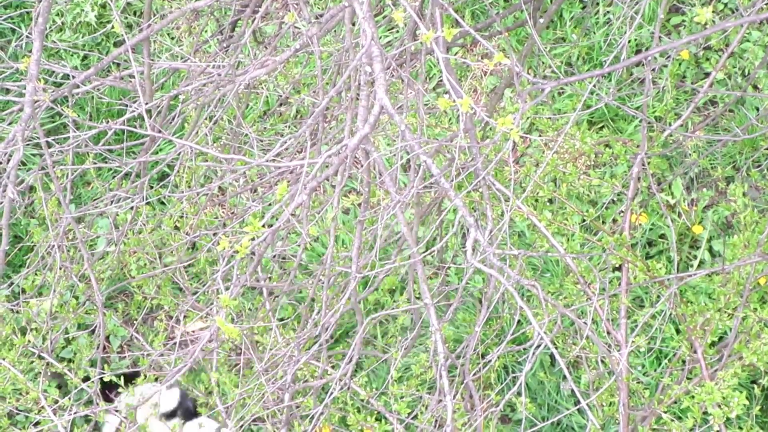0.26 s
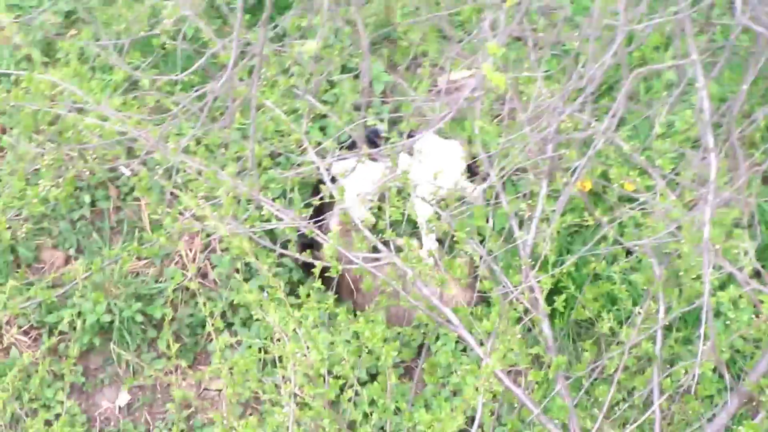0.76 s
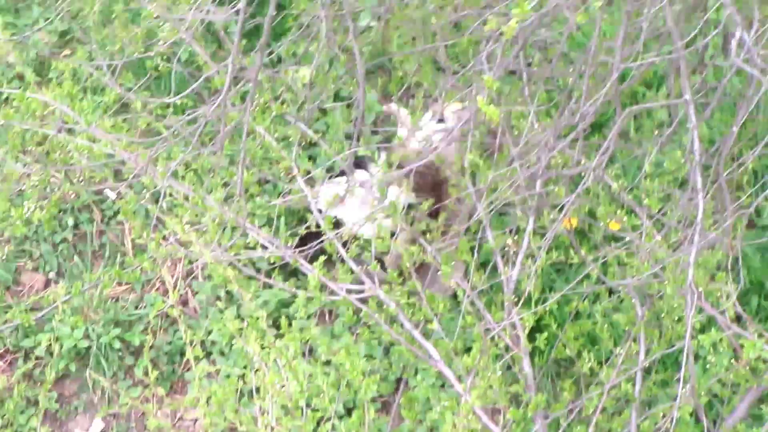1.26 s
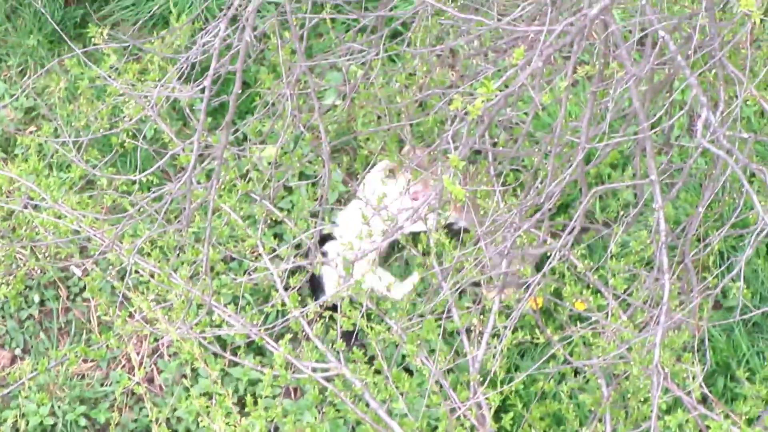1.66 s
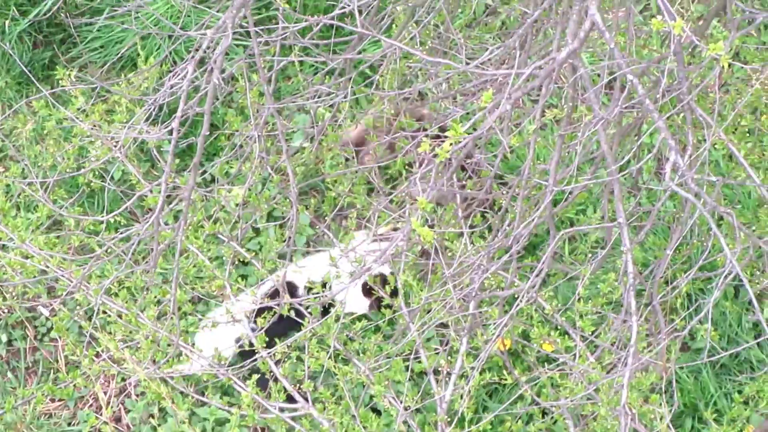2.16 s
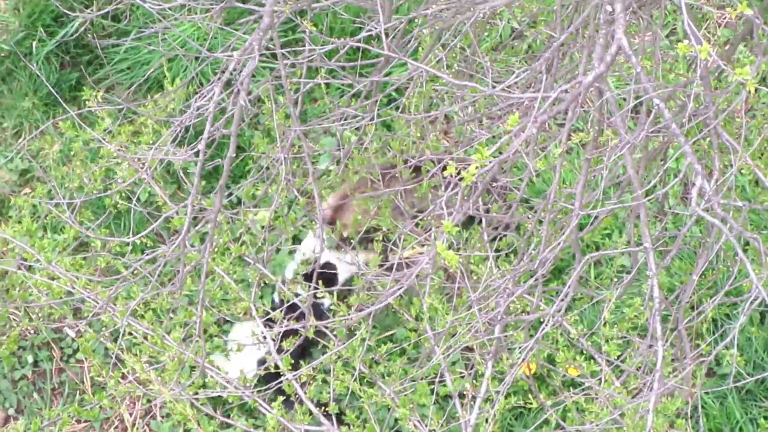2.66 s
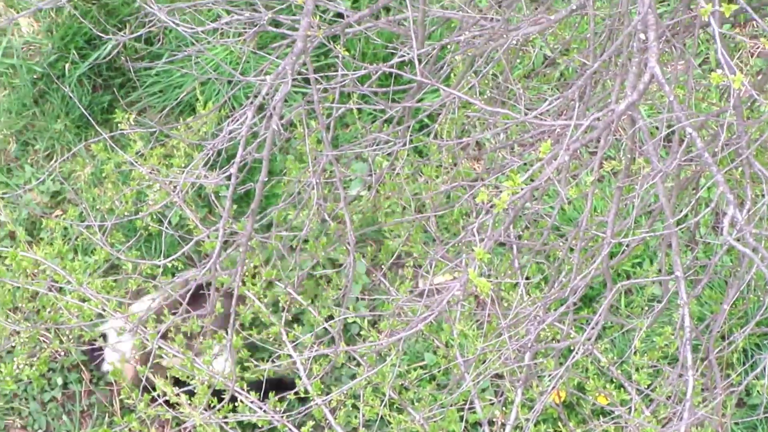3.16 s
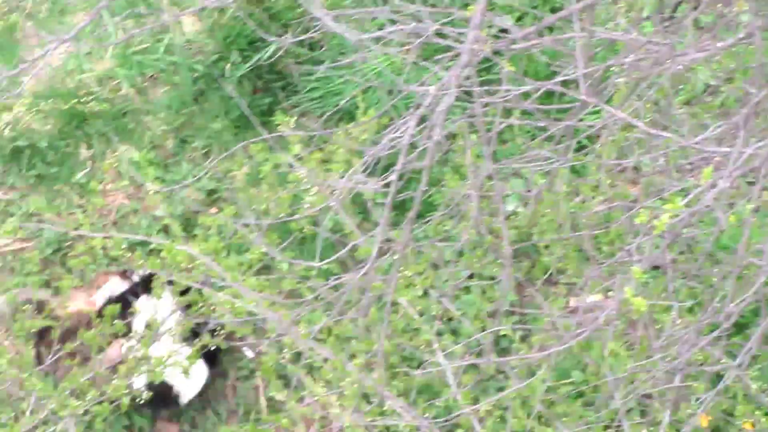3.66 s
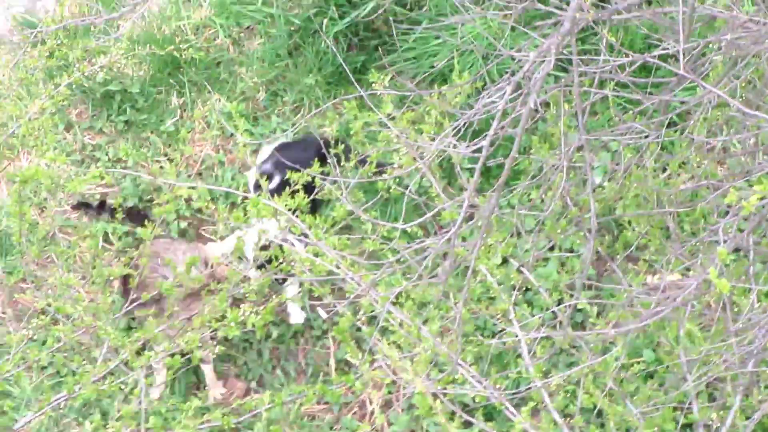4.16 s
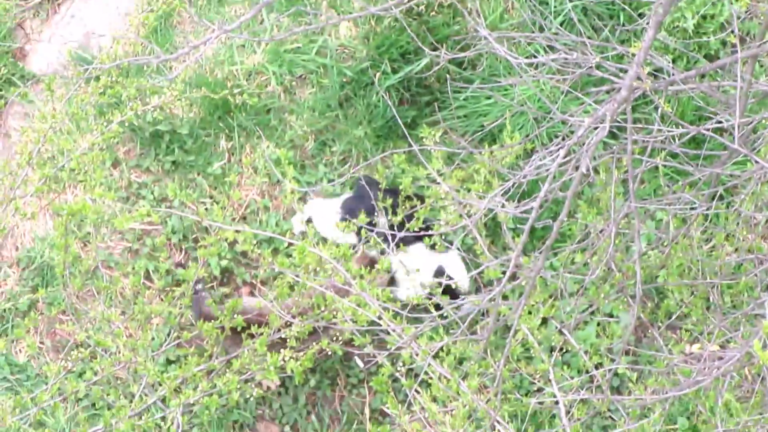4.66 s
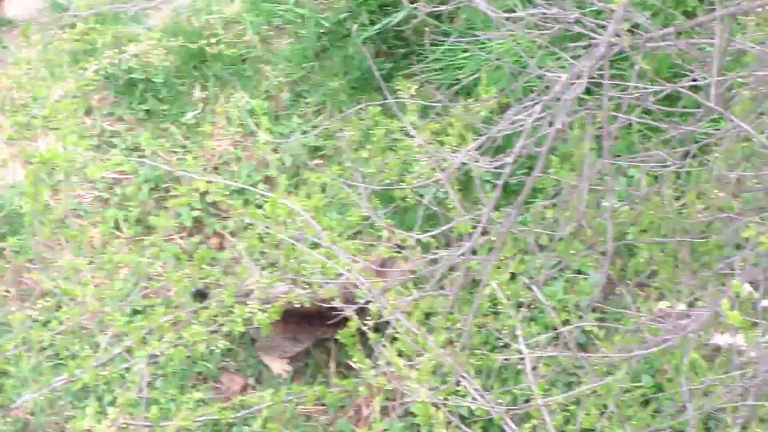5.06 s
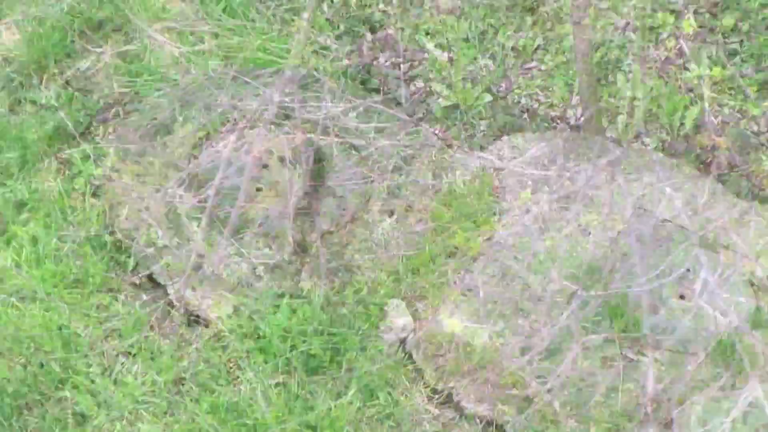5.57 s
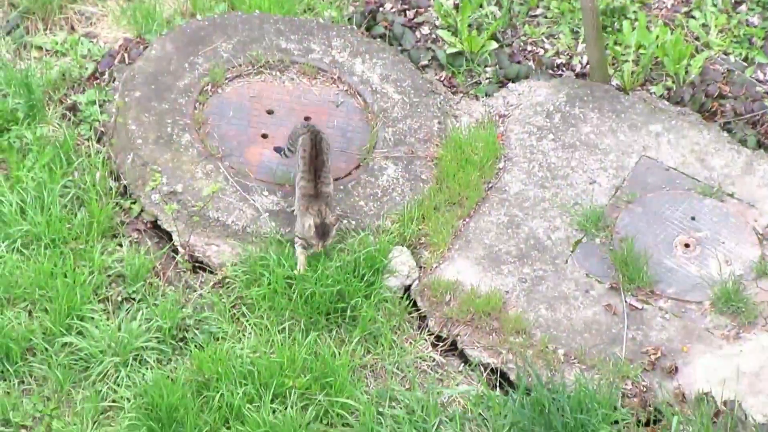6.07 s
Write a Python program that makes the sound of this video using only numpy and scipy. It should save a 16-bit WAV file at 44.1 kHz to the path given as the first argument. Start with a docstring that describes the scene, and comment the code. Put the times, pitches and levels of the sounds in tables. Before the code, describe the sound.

Two fighting cats scream at once, high, wavering and torn with rasp, in bushes below a window. Walls return a dull echo over low town rumble. After a brief gap of rustling leaves and snapping twigs, the screams resume quieter, then flare again. A vehicle accelerates past behind them, and a small bird chatters as the cats fall silent.

```python
"""From the start cats scream shrilly in undergrowth below a window, over the noise rumble of a town. Harmonic lines
on one wavering pitch break into half, third and quarter pitch and noisy rasp; nearby walls return an echo.
From 2.1 s noise bursts make leaves rustle and twigs snap. From 2.3 s a turbocharged vehicle fades in, built of
firing orders, tyre noise and a rising whistle; it accelerates past, loudest near 5.2 s.
From 4.4 s a small bird chatters in short falling sine notes."""
import sys
import numpy as np
from scipy import signal
from scipy.fft import rfft, irfft
from scipy.io import wavfile
from scipy.ndimage import uniform_filter1d

SR = 44100
rng = np.random.default_rng(int(sys.argv[2]) if len(sys.argv) > 2 else 0)


def wrap_up_sound(samples):
    """Save the sound to the file named by the first command line argument, as 16-bit audio."""
    columns = np.atleast_2d(samples).T
    # keep every value between -1 and 1, then stretch to whole-number steps
    tamed = np.clip(columns, -1, 1)
    steps = np.round(tamed * 32767).astype(np.int16)
    wavfile.write(sys.argv[1], SR, steps)


N = 279014


def from_db(db):
    """Logarithmic level: decibels to amplitude gain."""
    return 10 ** (np.asarray(db) / 20)


def rms_one(x):
    """Power normalisation: scale to rms 1."""
    return x / np.sqrt(np.mean(x ** 2) + 1e-20)


def in_time(rows):
    """Linear interpolation: columns of a table joined by straight lines, one value a sample."""
    s, *columns = np.transpose(rows)
    return [np.interp(np.arange(N) / SR, s, c) for c in columns]


def at_hz(points, hz):
    """Spectral envelope: levels interpolated on a log-frequency axis."""
    return np.interp(np.log(hz), np.log(np.array(points)[:, 0]), np.array(points)[:, 1])


def between(start, end, fade):
    """Gating: open from start to end, with linear fades centred on both."""
    t = np.arange(N) / SR
    return np.clip(np.minimum(t - start, end - t) / fade + .5, 0, 1)


def held(rows, fade):
    """Gating of tables: each column holds its value from start to end of its row, and is zero elsewhere."""
    gates = np.array([between(start, end, fade) for start, end, *values in rows])
    return np.array([values for start, end, *values in rows]).T @ gates


def drift(rate, size=N):
    """Random modulation: noise through a double one-pole low-pass at rate Hz; spread about 1."""
    r = np.exp(-2 * np.pi * rate / SR)
    noise = rng.standard_normal(size + SR // 4)
    return rms_one(signal.lfilter([1], [1, -2 * r, r * r], noise))[SR // 4:]  # drop the filter's start


def coloured(spectrum):
    """Spectral shaping: noise with the given spectrum; rms 1."""
    hz = np.maximum(np.fft.rfftfreq(N, 1 / SR), 1)
    return rms_one(irfft(rfft(rng.standard_normal(N)) * from_db(at_hz(spectrum, hz)), N))


def band_noise(noise, low_hz, high_hz):
    """Band limitation: a band-pass filter leaves one region of the noise; rms 1."""
    band = signal.butter(2, [low_hz, high_hz], "band", fs=SR, output="sos")
    return rms_one(signal.sosfilt(band, noise))


# town rumble, relative spectral density: (f/Hz, level/dB per Hz)
TOWN_SPECTRUM = [(18, -37), (30, -5.5), (69, -8), (228, -8), (404, -11.5), (1170, -10.5), (1480, -12.5),
                 (2700, -24.5), (3680, -34), (15000, -54.5)]
TOWN_DB = -32


def town():
    """Broadband ambience: low-weighted noise whose level wavers slightly."""
    return from_db(TOWN_DB + 0.33 * drift(5.5)) * coloured(TOWN_SPECTRUM)


# passing vehicle: (t/s, firing rate f/Hz, engine level/dB, tyre roar level/dB, tyre hiss level/dB);
# the roar is played 0.5 dB lower and the hiss 7 dB higher
VEHICLE_PASS = [(2.3, 37.88, -57.5, -53.5, -60), (3.2, 47.26, -51, -49, -73), (3.93, 55, -42, -38, -60),
                (4.45, 61.1, -44, -32.5, -54.5), (4.75, 66.26, -35.5, -26.5, -47),
                (5.2, 72.5, -31, -20.5, -43), (5.74, 79.8, -36, -27, -49.5), (6.0, 81.8, -51, -35.5, -56.5),
                (6.2, 83, -50, -59, -99)]
# engine orders: (multiple of firing rate, level/dB relative to the engine level)
ENGINE_ORDERS = [(1, -1.5), (2, 3), (3, -8), (4, -5), (5, -5.5)]
# tyre roar and tyre hiss, relative spectral density: (f/Hz, level/dB per Hz)
ROAR_SPECTRUM = [(100, -55.5), (143, -7), (174, -11.5), (295, -10), (826, -11), (1260, -14.5), (2320, -11),
                 (5000, -37), (6500, -72)]
HISS_SPECTRUM = [(2060, -28), (3500, 2), (4580, -7), (10200, -9.5), (12600, -20), (15000, -23)]
# turbo whistle: (t/s, f/Hz, level/dB)
TURBO_WHISTLE = [(2.7, 9300, -81), (3.3, 10820, -73), (4.6, 12170, -82), (4.85, 13000, -59),
                 (5.3, 14700, -59), (5.4, 15000, -80)]


def vehicle():
    """Order spectrum: harmonics of the firing rate, with tyre noise that swells and fades and a rising whistle."""
    rate, engine_db, roar_db, hiss_db = in_time(VEHICLE_PASS)
    firings = np.cumsum(rate * (1 + 0.0024 * drift(8))) / SR
    engine = np.zeros(N)
    for k, db in ENGINE_ORDERS:
        order = np.sin(2 * np.pi * (round(k) * firings + rng.random()))
        engine += from_db(db + 2 * drift(3.4)) * order
    roar = from_db(roar_db - 0.5 + 0.27 * drift(9.8)) * coloured(ROAR_SPECTRUM)
    hiss = from_db(hiss_db + 7 + 1.1 * drift(13)) * coloured(HISS_SPECTRUM)
    hz, whistle_db = in_time(TURBO_WHISTLE)
    whistle_phase = 2 * np.pi * np.cumsum(hz * (1 + .002 * drift(30))) / SR
    whistle = from_db(whistle_db + 2.5 * drift(20)) * np.sin(whistle_phase)
    fade_in = between(VEHICLE_PASS[0][0], 7, 0.78)
    return fade_in * (from_db(engine_db) * engine + roar + hiss + whistle)


# pairs of notes, high then low, each pair following sooner than the last
BIRD_START_S, BIRD_PAIR_S, BIRD_QUICKEN_S, BIRD_GAP_S, BIRD_PAIRS = 4.435, .125, .0012, .035, 13
BIRD_HIGH_HZ, BIRD_LOW_HZ, BIRD_HIGH_DB, BIRD_LOW_DB = 7400, 6700, -47, -43


def bird(note_s=0.005, fall=0.02):
    """Frequency modulation: falling sine notes under a Gaussian envelope, each a little different."""
    u = np.arange(-3 * note_s * SR, 3 * note_s * SR) / SR / note_s  # time in note widths
    out = np.zeros(N)
    for k in range(BIRD_PAIRS):
        s = BIRD_START_S + BIRD_PAIR_S * k - BIRD_QUICKEN_S * k * k
        high = (s, BIRD_HIGH_HZ, BIRD_HIGH_DB)
        low = (s + BIRD_GAP_S, BIRD_LOW_HZ, BIRD_LOW_DB)
        for at, hz, level_db in (high, low):
            late, sharp, loud = rng.standard_normal(3)
            i = int((at + 0.0016 * late) * SR) - len(u) // 2
            phase = 2 * np.pi * hz * (1 + 0.015 * sharp) * note_s * (u - fall * u ** 2 / 2)
            out[i:i + len(u)] += from_db(level_db + 2.9 * loud) * np.exp(-u ** 2) * np.sin(phase)
    return out


# leaves brushed by the cats: (start t/s, end t/s, level/dB)
LEAF_RUSTLES = [(2.1, 2.3, -53), (2.48, 2.6, -57)]


def leaves():
    """Granular noise: fast level swings break a treble band into dense small crackles."""
    crackle = rng.standard_normal(N) * from_db(5.0 * drift(150))
    level = sum(from_db(db) * between(start, end, .04) for start, end, db in LEAF_RUSTLES)
    return level * band_noise(crackle, 4200, 8500)


# twigs and dry leaves snap under the cats: (t/s, peak level/dB, taken as 9 dB over the rms at onset)
TWIG_SNAPS = [(2.16, -38), (2.1744, -36), (3.0264, -38), (3.3844, -35), (3.904, -33)]


def twigs(decay_s=0.0047):
    """Impulsive excitation: each snap is a bright noise burst that decays exponentially in milliseconds."""
    t = np.arange(N) / SR
    bursts = np.zeros(N)
    for s, db in TWIG_SNAPS:
        bursts += from_db(db - 9) * np.exp(-np.maximum(t - s, 0) / decay_s) * (t > s)
    return bursts * band_noise(rng.standard_normal(N), 5000, 13500)


YARD_T60_S, YARD_DB, WALL_CUT_HZ = 0.98, -11.5, 4200  # levels before the walls' low-pass
ECHO_S, ECHO_DB = .1052, -17.5


def yard(x):
    """Reverberation by convolution: near walls return a dull, dense tail; one far wall a single echo."""
    t = np.arange(int(1.2 * SR)) / SR
    tail = rng.standard_normal(len(t)) * from_db(-60 * t / YARD_T60_S) * (t > .025)
    tail *= from_db(YARD_DB) / np.sqrt(np.sum(tail ** 2))
    tail[round(ECHO_S * SR)] += from_db(ECHO_DB)
    tail = signal.sosfilt(signal.butter(2, WALL_CUT_HZ, fs=SR, output="sos"), tail)
    return signal.fftconvolve(x, tail)[:N]


# throat and mouth resonance: (f/Hz, level/dB)
THROAT_GAIN = [(800, -24.5), (1600, -11), (2400, -0.5), (3800, -6), (5000, -8.5), (7000, -12),
               (8400, -30.5), (9600, -35), (12000, -40.5), (15000, -58)]


def partial(cycles, pitch, multiple):
    """Source-filter principle: one line of the voice, weighted by the throat; rms 1 at a throat gain of 0 dB."""
    hz = np.minimum(multiple * pitch, .45 * SR)
    wave = np.sin(2 * np.pi * (multiple * cycles + rng.random()))
    return np.sqrt(2) * from_db(at_hz(THROAT_GAIN, hz)) * wave


TEAR = .36  # depth of tearing per unit of chaos, before a doubling in torn()


def torn(chaos):
    """Random amplitude modulation: uneven cycles tear a line into fragments at roughly constant power."""
    depth = 2 * TEAR * chaos
    return (1 + depth * np.tanh(drift(140))) / np.sqrt(1 + depth ** 2)


# screams: (start t/s, end t/s, fundamental level/dB at usual effort)
SCREAM_SPANS = [(-1, 1.34, -30.5), (1.34, 1.666, -31), (1.684, 2.112, -30.5), (2.5, 3.18, -38),
                (3.18, 3.9, -39), (3.9, 4.485, -31)]
# effort by phrase, as the level of the strongest lines before their constant gain: (t/s, level/dB)
EFFORT_CURVE = [
    [(0.0, -21), (0.022, -18), (0.188, -25), (0.256, -14), (0.35, -28), (0.37, -14), (0.402, -24),
     (0.438, -19), (0.45, -24), (0.534, -16), (0.602, -23), (0.642, -15), (0.7, -23)],
    [(0.722, -26), (0.732, -18), (0.858, -22), (0.922, -15), (0.96, -24), (1.13, -16), (1.15, -20),
     (1.212, -17), (1.228, -21), (1.29, -14), (1.312, -21), (1.34, -19)],
    [(1.34, -17), (1.36, -13), (1.378, -21), (1.426, -22), (1.434, -18), (1.468, -26), (1.492, -19),
     (1.554, -19), (1.568, -25), (1.624, -19), (1.632, -25), (1.68, -32)],
    [(1.706, -30), (1.752, -16), (1.778, -16), (1.794, -11), (1.816, -18), (1.872, -16), (1.932, -30),
     (2.004, -13), (2.058, -18), (2.098, -12), (2.117, -25)],
    [(2.5, -37), (2.52, -35), (2.53, -24), (2.542, -23), (2.578, -32), (2.636, -24), (2.772, -21),
     (2.978, -28), (3.014, -23), (3.082, -28), (3.18, -24)],
    [(3.21, -16), (3.23, -18), (3.27, -11), (3.454, -16), (3.466, -11), (3.54, -20), (3.552, -10),
     (3.606, -15), (3.634, -26), (3.74, -22), (3.808, -9), (3.9, -20)],
    [(3.946, -24), (3.952, -17), (3.984, -8), (4.018, -15), (4.146, -13), (4.156, -17), (4.27, -10),
     (4.282, -14), (4.308, -9), (4.382, -23), (4.464, -15), (4.49, -31)],
]
USUAL_EFFORT_DB, FIRST_FOLLOWS = -18, .4  # share of the effort's swing in the fundamental
STRONG_LINES_DB = -.7  # constant gain of the second harmonic and half lines
# the fundamental leaps out or sinks: (start t/s, end t/s, lift level/dB)
YELP_LIFTS = [(0, .03, 9), (.28, .36, 5), (.38, .75, -4), (1.23, 1.34, 5), (1.697, 1.728, 22),
              (1.728, 1.77, 13), (3.0, 3.17, 9), (3.19, 3.37, 14), (3.918, 3.956, 24), (4.4, 4.49, -5)]
# overtones by phrase: (t/s, level/dB)
OVERTONE_CURVE = [
    [(0.0, -25), (0.21, -27), (0.298, -21), (0.314, -30), (0.626, -23)],
    [(0.7, -26), (0.776, -32), (1.002, -26), (1.03, -31), (1.208, -32), (1.34, -23)],
    [(1.34, -24), (1.376, -31), (1.424, -28), (1.462, -45), (1.556, -32), (1.66, -38)],
    [(1.68, -51), (1.754, -30), (1.958, -47), (2.008, -27), (2.102, -39), (2.117, -51)],
    [(2.5, -50), (2.58, -44), (2.624, -31), (2.934, -37), (2.964, -35), (3.18, -39)],
    [(3.18, -40), (3.248, -28), (3.382, -31), (3.408, -37), (3.754, -36), (3.9, -47)],
    [(3.9, -48), (3.978, -35), (4.0, -48), (4.314, -41), (4.49, -48)],
]
# strong and weak cycles alternate:
# (start t/s, end t/s, half lines over second harmonic level/dB, upper half line over lower level/dB)
PERIOD_DOUBLINGS = [(.125, .2, -1, 4), (.245, .27, 2, -3), (.385, .41, 8, -7), (.45, .49, 6, -10),
                    (.63, .66, 9, -16), (.66, .71, 6, 5), (.795, .82, 15, 15), (.82, .84, 0, -12),
                    (.84, .875, 10, 14), (.895, .95, 15, 2), (.955, 1.01, 2, 6), (1.015, 1.225, 5, 0),
                    (1.34, 1.53, 15, -14), (1.58, 1.66, 12, -18), (1.73, 1.77, -3, -25),
                    (2.0, 2.07, -5, -3), (2.575, 3.18, 1, -2), (3.18, 3.235, 10, -8),
                    (3.305, 3.335, 0, -16), (3.41, 3.49, -13, 6), (3.5, 3.555, -6, -7), (3.59, 3.77, -4, 6),
                    (4.325, 4.375, -12, -3)]
STEADY_HALVES_DB, DOUBLING_FADE_S, YELP_FADE_S = -31, .012, .014


def line_levels():
    """Power sharing: dB of the fundamental, lower half line, second harmonic, upper half line, overtones."""
    effort_db, = in_time(sum(EFFORT_CURVE, []))
    swing_db = effort_db - USUAL_EFFORT_DB
    starts, ends, scream_db = np.transpose(SCREAM_SPANS)
    scream = np.searchsorted(starts, np.arange(N) / SR) - 1
    first_db = uniform_filter1d(scream_db[scream], size=SR // 100) + FIRST_FOLLOWS * swing_db
    first_db = first_db + held(YELP_LIFTS, YELP_FADE_S)[0] + 3.0 * drift(35)
    upper_db = in_time(sum(OVERTONE_CURVE, []))[0]
    rises = [(a, b, db - STEADY_HALVES_DB, lean) for a, b, db, lean in PERIOD_DOUBLINGS]
    rise_db, lean_db = held(rises, DOUBLING_FADE_S)
    low_db = STEADY_HALVES_DB + rise_db + np.minimum(-lean_db, 0)
    high_db = STEADY_HALVES_DB + rise_db + np.minimum(lean_db, 0)
    # the second harmonic and both half lines share the effort
    shared_power = 1 + from_db(low_db) ** 2 + from_db(high_db) ** 2
    second_db = effort_db + STRONG_LINES_DB - 10 * np.log10(shared_power)
    return first_db, second_db + low_db, second_db, second_db + high_db, upper_db


# pitch through each scream: (t/s, f/Hz)
PITCH_CURVE = [
    [(0.0, 1842), (0.024, 2034), (0.042, 1724), (0.12, 1770), (0.132, 1625), (0.195, 1700), (0.233, 1950),
     (0.261, 1645), (0.373, 1558), (0.392, 1543), (0.433, 1346), (0.473, 1506), (0.486, 1760),
     (0.497, 1832), (0.513, 1567), (0.639, 1636), (0.688, 1555), (0.784, 1638), (0.88, 1560), (0.9, 1658),
     (0.95, 1559), (1.197, 1534), (1.263, 1750), (1.333, 1691)],
    [(1.369, 1558), (1.42, 1515), (1.45, 1553), (1.537, 1723), (1.582, 1707), (1.62, 1554), (1.642, 1699),
     (1.674, 1687)],
    [(1.684, 1020), (1.7, 1310), (1.713, 1220), (1.754, 1478), (1.84, 1144), (1.894, 1351), (2.023, 1412),
     (2.062, 1253), (2.079, 1212), (2.101, 907), (2.117, 803)],
    [(2.498, 620), (2.518, 660), (2.546, 1030), (2.6, 1456), (2.64, 1514), (2.794, 1576), (2.88, 1444),
     (2.955, 1420), (3.02, 1497), (3.163, 1562), (3.182, 1575)],
    [(3.193, 1756), (3.209, 1669), (3.225, 1760), (3.281, 1680), (3.344, 1870), (3.39, 1580), (3.474, 1475),
     (3.624, 1432), (3.682, 1512), (3.714, 1421), (3.783, 1535), (3.835, 1319), (3.897, 1300)],
    [(3.917, 1226), (3.945, 1459), (3.969, 1280), (4.033, 1137), (4.131, 1120), (4.192, 1161),
     (4.218, 1248), (4.242, 1190), (4.26, 1262), (4.28, 1178), (4.314, 1275), (4.334, 1291), (4.438, 1078),
     (4.488, 774)],
]
# the pitch trembles fast: (start t/s, end t/s, share of pitch added to the steady tremble)
PITCH_FLUTTERS = [(1.37, 1.65, .015), (2.6, 3.02, .006), (2.5, 2.6, .035), (3.185, 3.235, .015),
                  (3.305, 3.35, .02), (4.36, 4.44, .01)]
FLUTTER_HZ, STEADY_FLUTTER = 70, .005  # mean rate; share of pitch that never stops trembling
GRAIN = .0045  # fast pitch grain, share of pitch outside chaos


def wavering_pitch(chaos, jitter=0.006, rough_jitter=.008):
    """Frequency modulation: slow jitter, chaotic jitter, fine grain and a tremble move the pitch in Hz."""
    wander = jitter * drift(39.4) + rough_jitter * chaos * drift(124.3)
    wander += GRAIN * (1 + 2 * chaos) * drift(402)
    pitch = uniform_filter1d(in_time(sum(PITCH_CURVE, []))[0], size=SR // 100) * (1 + wander)
    tremble = np.sin(2 * np.pi * np.cumsum(FLUTTER_HZ * (1 + .3 * drift(15))) / SR)
    return pitch * (1 + (STEADY_FLUTTER + held(PITCH_FLUTTERS, .03)[0]) * tremble)


# the third harmonic rings out: (start t/s, end t/s, lift level/dB)
THIRD_HARMONIC_LIFTS = [(.51, .63, 4), (1.54, 1.585, 9), (2.04, 2.11, 8), (2.505, 2.555, 9),
                        (3.23, 3.31, 4), (4.385, 4.43, 10), (4.43, 4.48, 15)]
THIRD_SHARE_DB = -2.5  # the third harmonic's part of the overtones' level
OVERTONE_HZ = 4560  # where the throat's gain is taken as 0 dB for the overtones
FLICKER_DB = 4.5  # greatest swing of each overtone


def overtones(cycles, pitch, chaos, upper_db, halves, tilt_db=-2.0):
    """Harmonic series: multiples 3 to 8 of the pitch and the half lines above them, each flickering."""
    top = from_db(THIRD_SHARE_DB - at_hz(THROAT_GAIN, OVERTONE_HZ))
    tone = np.zeros(N)
    for k in range(3, 9):
        weight = top * from_db(tilt_db * (k - 3))  # the folds give less at each higher multiple
        lift_db = held(THIRD_HARMONIC_LIFTS, .02)[0] if k == 3 else 0
        level = from_db(upper_db + lift_db + FLICKER_DB * np.tanh(2 * drift(14)))
        tone += weight * level * torn(chaos) * partial(cycles, pitch, k)
        # strong and weak cycles alternate: lines halfway between the harmonics
        half_level = halves * from_db(FLICKER_DB * np.tanh(2 * drift(20)))
        tone += weight * half_level * torn(chaos) * partial(cycles, pitch, k + .5)
    return tone


# the folds lock into a longer pattern: (start t/s, end t/s, cycles in the pattern, level/dB)
PATTERN_BREAKS = [(.12, .21, 4, -33), (.375, .47, 3, -36), (.64, .72, 4, -38), (.79, .94, 4, -34),
                  (.95, 1.03, 4, -31), (1.06, 1.2, 4, -41), (2.03, 2.07, 4, -36), (3.67, 3.77, 4, -37)]
BREAK_TILT_DB = 3  # per octave: the finer lines are brighter than the voice


def add_breaks(tone, cycles, pitch):
    """Subharmonic locking: a pattern of several cycles adds lines at fractions of the pitch, in place."""
    for start, end, period, level_db in PATTERN_BREAKS:
        count = int(round(period))
        part = slice(int((start - .01) * SR), int((end + .01) * SR))
        lines = 0
        for k in range(count, 5 * count):
            if 2 * k % count == 0:  # whole and half lines sound already
                continue
            waver_db = 5.5 * drift(60, size=part.stop - part.start)
            gain = from_db(BREAK_TILT_DB * np.log2(k / count / 2) + waver_db)
            lines = lines + partial(cycles[part], pitch[part], k / count) * gain
        tone[part] += from_db(level_db) * between(start, end, .012)[part] * lines


# air through the teeth, relative spectral density: (f/Hz, level/dB per Hz)
SPRAY_SPECTRUM = [(5000, -32.5), (8000, -11), (9500, 1), (11000, -2), (12700, -3), (14000, -9),
                  (15000, -12)]


def rasping_air(cycles, pitch, rasp, spray, rasp_depth=0.44):
    """Turbulence: noise and short-lived lines, pulsed once every two cycles of the folds."""
    # the rasp is part noise, part lines at thirds of the pitch
    thirds = [k for k in range(4, 15) if k % 3]
    shreds = rms_one(sum(partial(cycles, pitch, k / 3) * np.maximum(drift(110), 0) for k in thirds))
    # the treble spray is part noise, part broken lines at halves of the pitch
    splinters = np.zeros(N)
    for k in range(10, 17):
        line = from_db(at_hz(SPRAY_SPECTRUM, k * pitch / 2)) * np.sin(np.pi * k * cycles)
        splinters += line * np.maximum(drift(45), 0)
    air = rasp * (0.95 * coloured(THROAT_GAIN) + 0.85 * shreds)
    air += spray * (.75 * coloured(SPRAY_SPECTRUM) + .58 * rms_one(splinters))
    return air * np.exp(rasp_depth * np.cos(np.pi * cycles))


# the voice turns chaotic: (start t/s, end t/s, rasp level/dB, treble spray level/dB)
RASP_SPELLS = [(0, 0.04, -27, -70), (0.211, 0.255, -27, -48), (0.474, 0.511, -26, -60),
               (0.622, 0.688, -33.5, -51), (0.93, 0.955, -30, -55), (1.03, 1.065, -36, -55),
               (1.34, 1.44, -32, -57), (1.477, 1.66, -36, -61), (1.71, 1.813, -36, -50),
               (1.977, 2.098, -39, -60), (2.5, 3.0, -47.5, -90), (3.184, 3.265, -28.5, -48),
               (3.3, 3.36, -27, -55), (3.42, 3.66, -45, -64), (3.68, 3.782, -37, -61),
               (3.899, 3.958, -48, -62)]


def cats(shimmer_db=1.4, breath_db=-9.5, hiss_db=-32.5):
    """Nonlinear phonation: whole, half and finer lines on one pitch; chaos shakes it and adds rasp."""
    first_db, low_half_db, second_db, high_half_db, upper_db = line_levels()
    spells = [between(start, end, 0.04) for start, end, rasp_db, spray_db in RASP_SPELLS]
    # louder rasp, more chaos
    chaos = sum(spell * np.clip((row[2] + 44) / 13, .3, 1) for spell, row in zip(spells, RASP_SPELLS))
    pitch = wavering_pitch(chaos)
    cycles = np.cumsum(pitch) / SR
    tone = np.zeros(N)
    strong = zip((2, 3, 4, 5), (first_db, low_half_db, second_db, high_half_db))  # in half-pitch steps
    for k, db in strong:
        tone += np.sqrt(2) * from_db(db) * torn(chaos) * np.sin(np.pi * k * cycles)
    halves_over_second_db = np.maximum(low_half_db, high_half_db) - second_db
    halves = from_db(upper_db - 5.5 + .6 * np.minimum(halves_over_second_db, 0))
    tone += overtones(cycles, pitch, chaos, upper_db, halves)
    # the half pitch itself sounds once
    tone += from_db(-24.5) * between(1.338, 1.378, 0.011) * np.sin(np.pi * cycles)
    add_breaks(tone, cycles, pitch)
    # some air always leaks past the folds, more as the overtones grow
    rasp = from_db(upper_db + breath_db)
    spray = from_db(upper_db + hiss_db)
    for spell, row in zip(spells, RASP_SPELLS):
        rasp = rasp + spell * from_db(row[2])
        spray = spray + spell * from_db(row[3])
    air = rasping_air(cycles, pitch, rasp, spray)
    voiced = sum(between(start, end, 0.016) for start, end, level_db in SCREAM_SPANS)
    return voiced * (tone * from_db(shimmer_db * drift(60)) + air * from_db(2.0 * drift(49)))


def scene():
    """Superposition: all sources and the cats' echo add at one microphone, sent alike to two channels."""
    voice = cats()
    mono = town() + vehicle() + bird() + leaves() + twigs() + yard(voice) + voice
    return np.vstack([mono, mono])


CUTOFF_HZ = 15400  # where the stopband begins, 75 dB down


def record(dry):
    """Band limitation and soft saturation: deep bass drops, peaks are rounded, the top is cut steeply."""
    dry = signal.sosfilt(signal.butter(3, 42, "high", fs=SR, output="sos"), dry)
    rounded = 1.2 * np.tanh(dry / 1.2)
    return signal.sosfilt(signal.cheby2(18, 75, CUTOFF_HZ, fs=SR, output="sos"), rounded)


dry = scene()
out = record(dry)
wrap_up_sound(out)
```